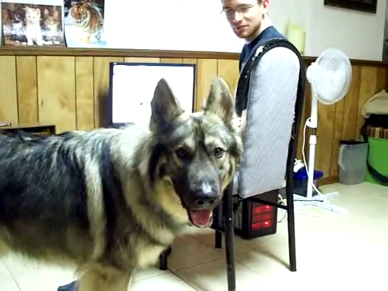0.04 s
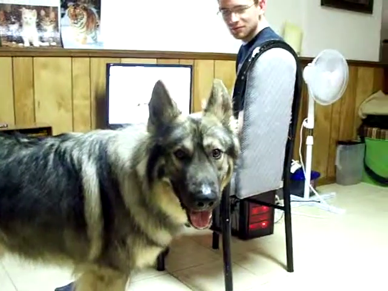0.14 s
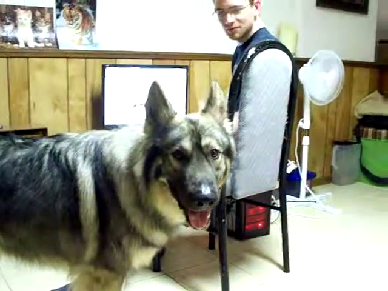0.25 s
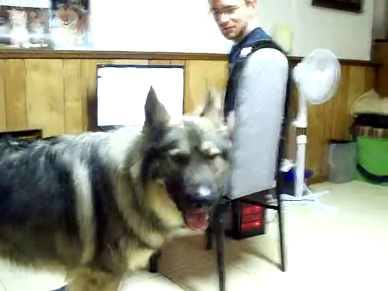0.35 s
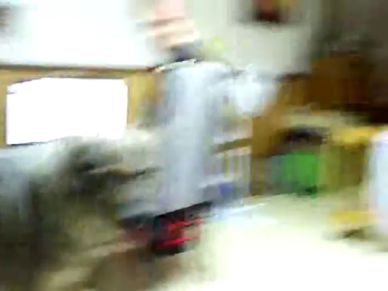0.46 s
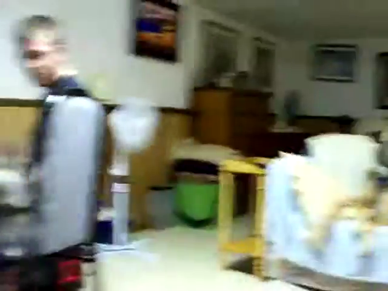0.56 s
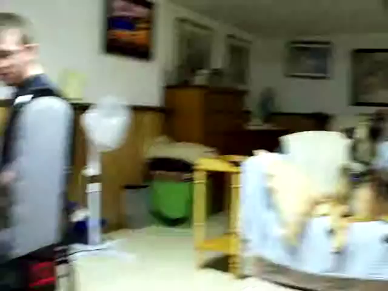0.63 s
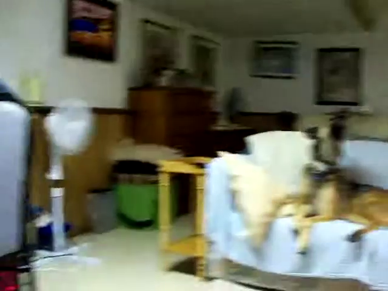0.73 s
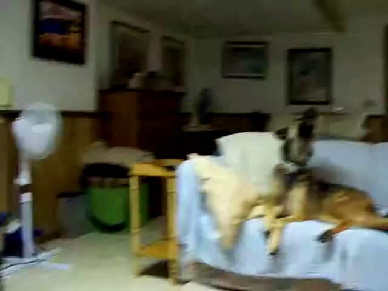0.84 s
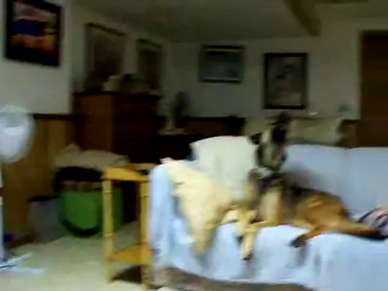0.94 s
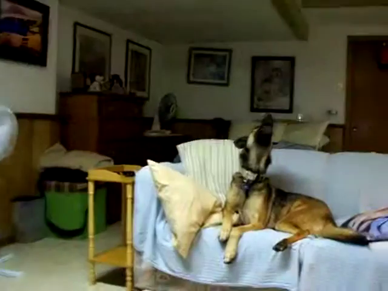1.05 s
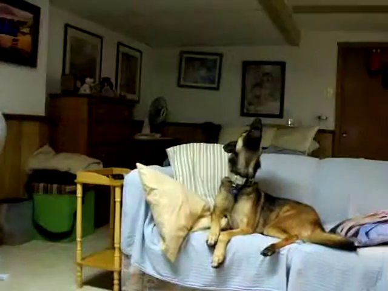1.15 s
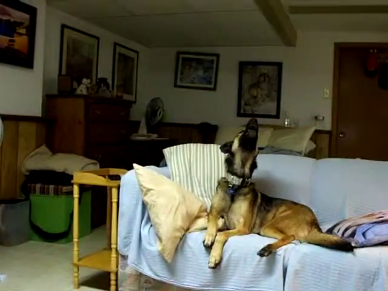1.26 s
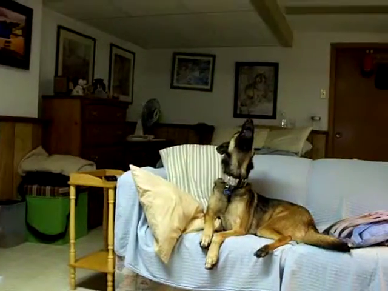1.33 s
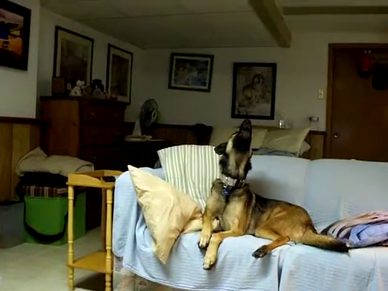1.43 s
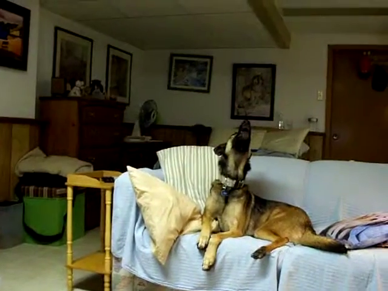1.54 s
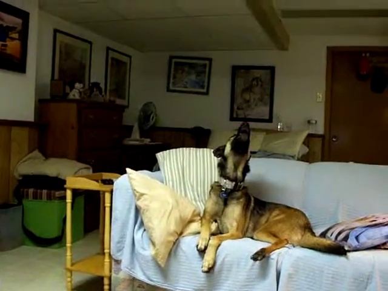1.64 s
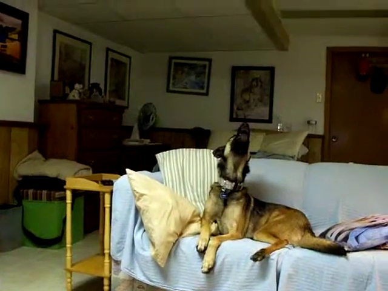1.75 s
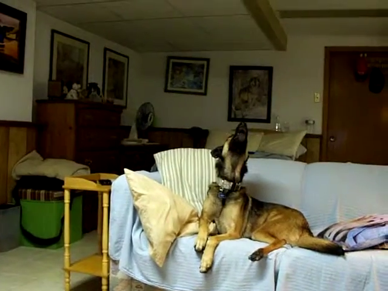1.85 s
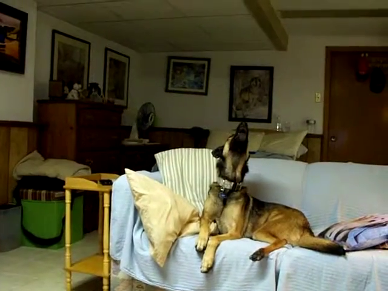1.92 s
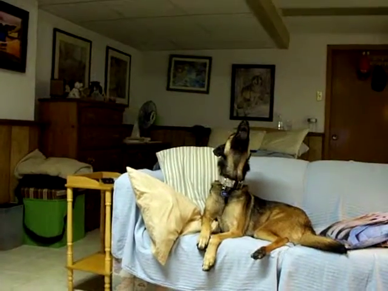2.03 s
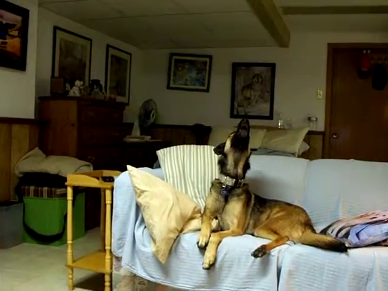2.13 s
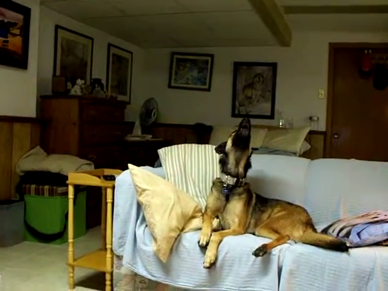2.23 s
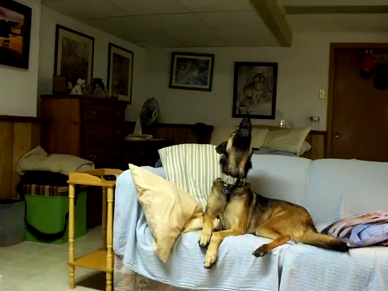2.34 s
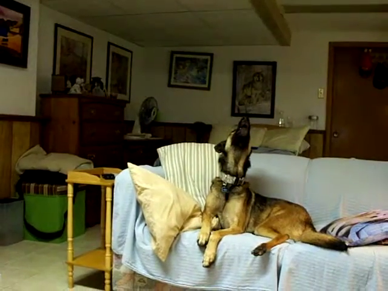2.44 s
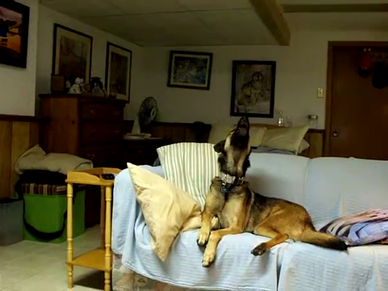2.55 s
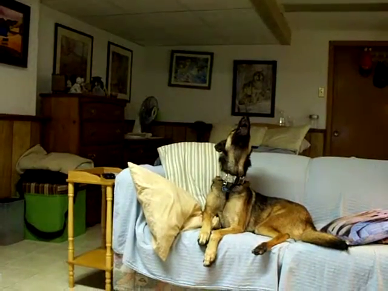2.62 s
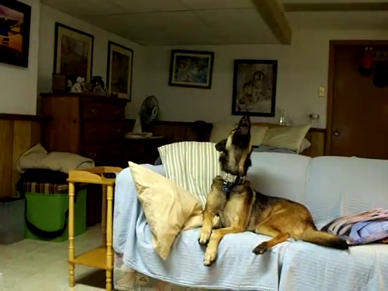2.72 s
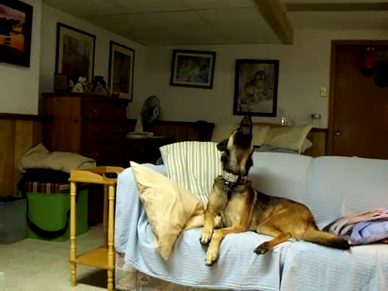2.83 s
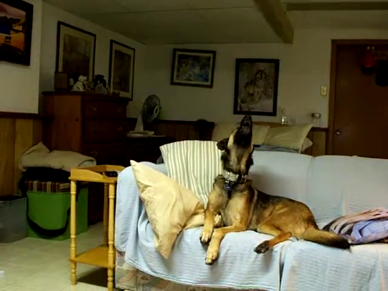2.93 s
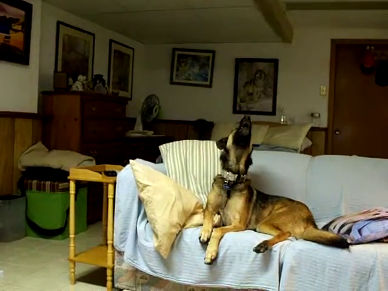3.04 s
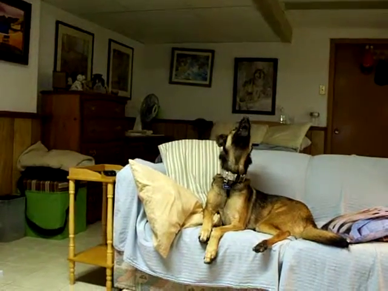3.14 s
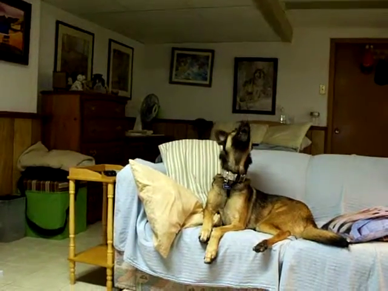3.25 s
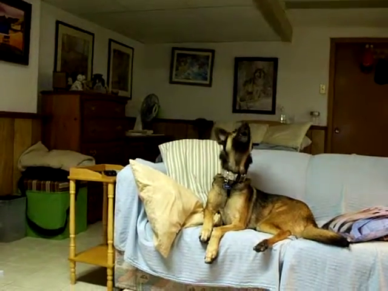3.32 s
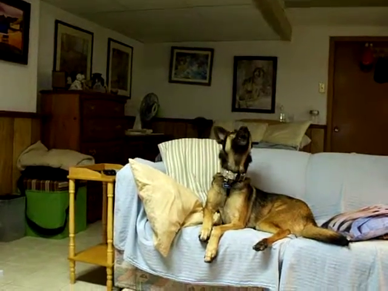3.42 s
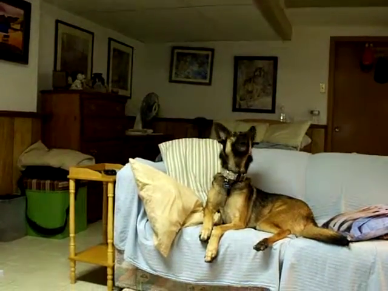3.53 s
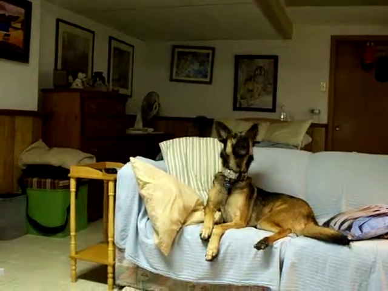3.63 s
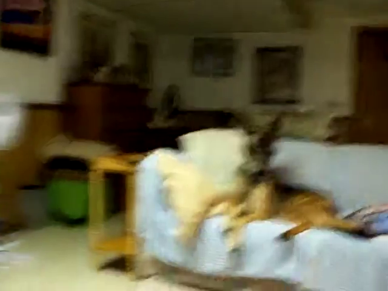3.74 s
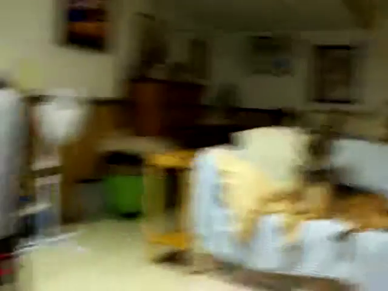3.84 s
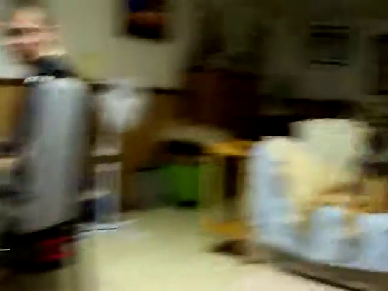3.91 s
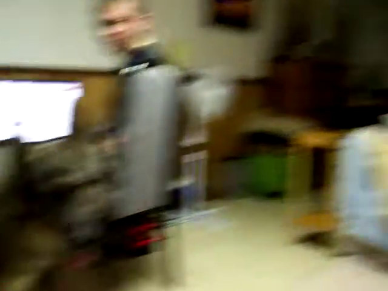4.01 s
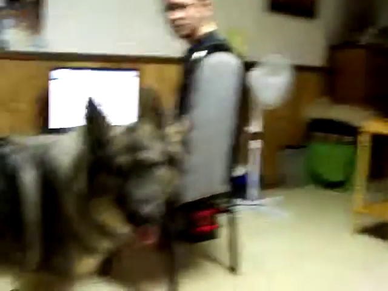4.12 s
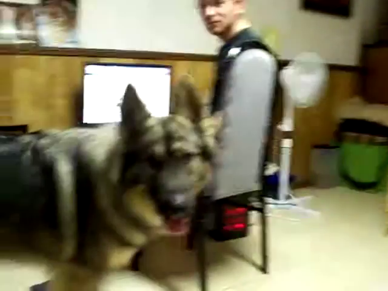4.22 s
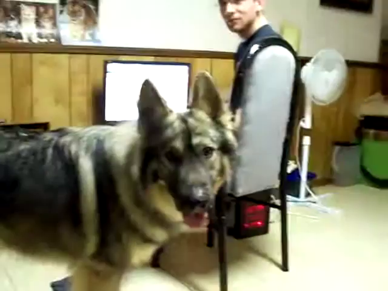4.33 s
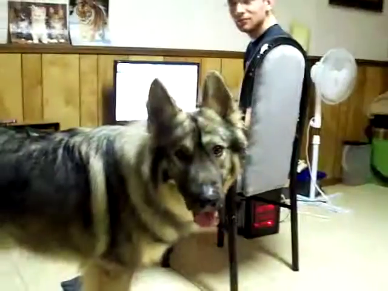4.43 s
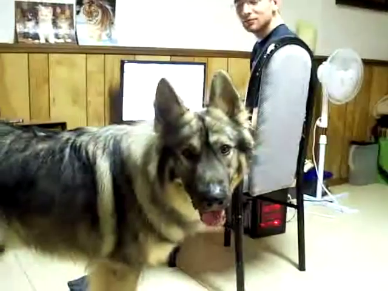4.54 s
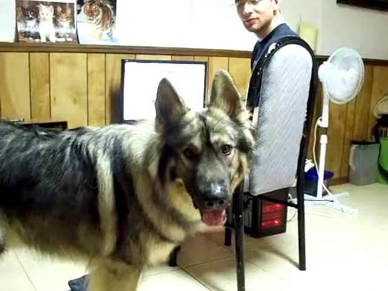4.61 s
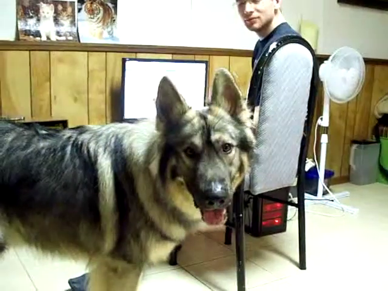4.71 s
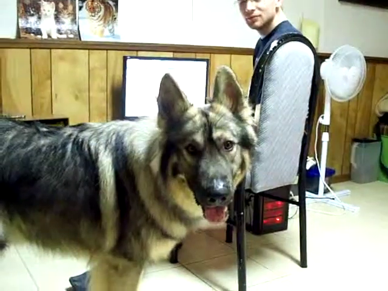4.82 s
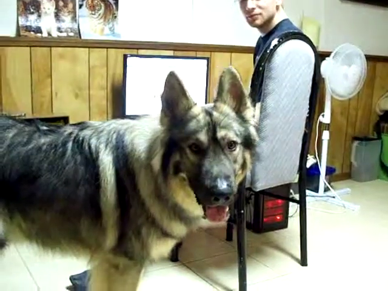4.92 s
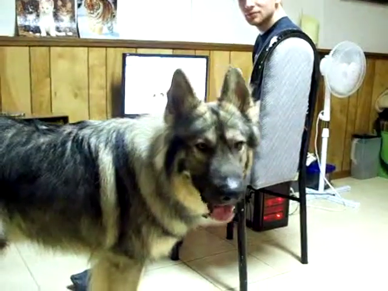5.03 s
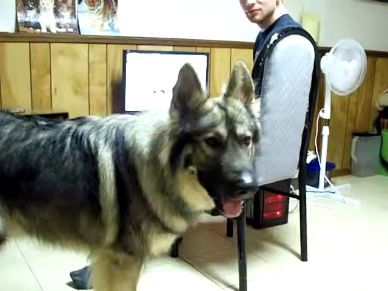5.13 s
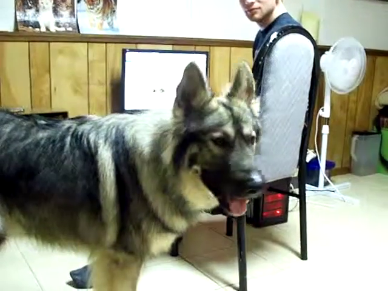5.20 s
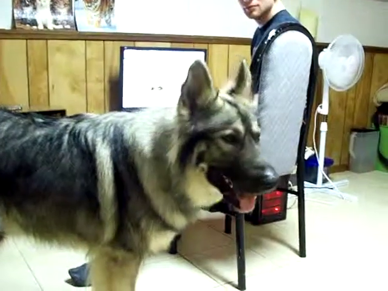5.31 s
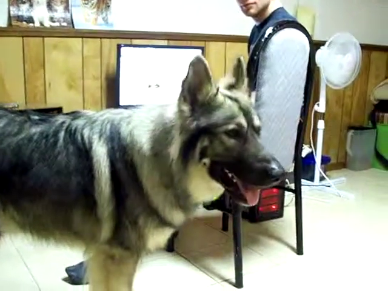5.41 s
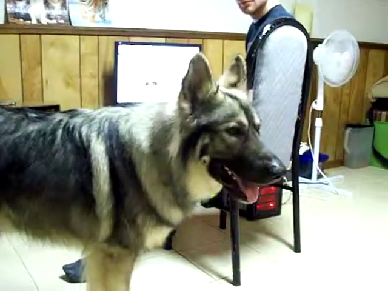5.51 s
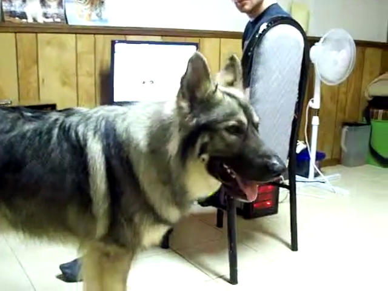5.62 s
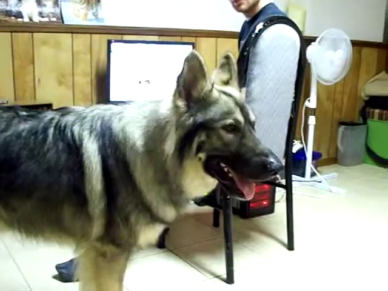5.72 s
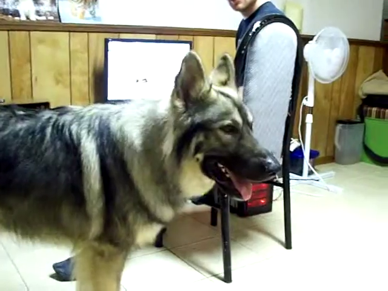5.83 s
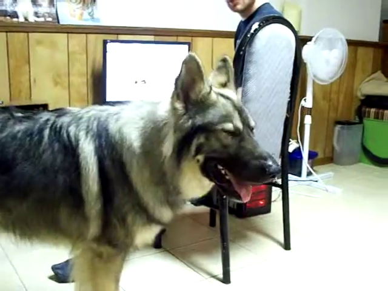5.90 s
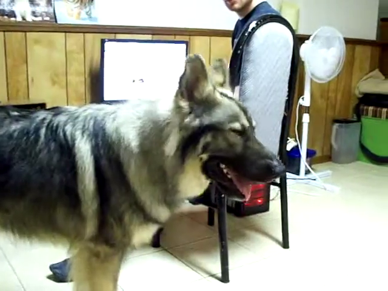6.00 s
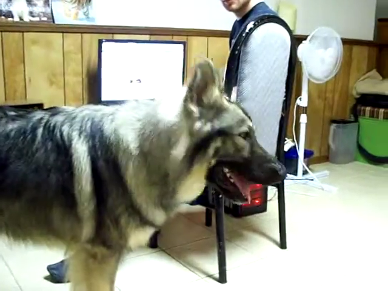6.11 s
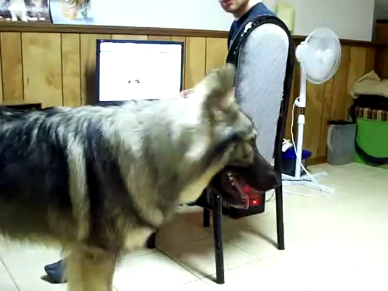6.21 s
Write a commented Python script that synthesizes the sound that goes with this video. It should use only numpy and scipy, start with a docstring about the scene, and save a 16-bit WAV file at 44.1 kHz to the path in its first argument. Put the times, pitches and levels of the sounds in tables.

```python
"""A large dog on a sofa gives a long, two-toned howl, sinks to a moan and then whines thinly; a nearer dog
sings under it at first and later comes in with a loud, pure howl. Dry clicks, a hum and room air lie around them.
Two vocal folds at different rates beat in the sofa howl; sines make the whine and the near howls.
Short decaying rings make the clicks; the loudest peaks are flattened, and a hiss follows the loudness."""
import sys
import numpy as np
from scipy import signal
from scipy.fft import rfft, irfft, next_fast_len
from scipy.io import wavfile
from scipy.ndimage import uniform_filter1d, map_coordinates

SR = 44100
rng = np.random.default_rng(int(sys.argv[2]) if len(sys.argv) > 2 else 0)


def put_to_file(sound):
    """Save the sound as 16-bit audio at rate SR, in the file named by the first command-line argument."""
    columns = np.atleast_2d(sound).T  # one column per channel
    safe = np.clip(columns, -1, 1)
    whole_steps = np.round(safe * 32767)
    wavfile.write(sys.argv[1], SR, whole_steps.astype(np.int16))


N = 276066  # length of the scene [samples]


def amp(db):
    """Turn decibels into a gain."""
    return np.exp(np.asarray(db) * np.log(10) / 20)


def unit(x):
    """Scale a sound to an rms level of 1."""
    return x / np.sqrt(np.mean(x ** 2) + 1e-20)


def along(points, hz):
    """Read a curve of (frequency [Hz], value) points, with frequency on a log axis."""
    f, v = np.transpose(points)
    return np.interp(np.log(hz + 1), np.log(f + 1), v)


def curves(rows):
    """Give one value per sample for each column after the time."""
    s, *cols = np.transpose(rows)
    return [np.interp(np.arange(N) / SR, s, c) for c in cols]


def sounding(rows):
    """Be 1 from the first time in a table to the last, with short soft edges."""
    t = np.arange(N) / SR
    inside = (t >= rows[0][0]) & (t <= rows[-1][0])
    return uniform_filter1d(1. * inside, size=300)


def wobble(rate):
    """Draw a smooth random curve through `rate` random points a second."""
    at = np.arange(0, N + 32, 32)  # work out every 32nd sample, then join them up
    points = rng.standard_normal(int(N * rate / SR) + 4)
    return np.interp(np.arange(N), at, map_coordinates(points, [at * rate / SR]))


def filtered(x, response):
    """Multiply the spectrum of x by a gain that depends on frequency."""
    m = next_fast_len(N + SR // 2)
    return irfft(rfft(x, m) * response(np.fft.rfftfreq(m, 1 / SR)), m)[:N]


def noise(spectrum):
    """Make noise of rms 1, coloured by (frequency [Hz], relative level [dB]) points."""
    return unit(filtered(rng.standard_normal(N), lambda hz: amp(along(spectrum, hz))))


def resonances(modes, f):
    """Add up the gain of peaks, each (centre [Hz], width [Hz], relative level [dB])."""
    return sum(amp(db) / (1 + ((f - c) / (w / 2)) ** 2) for c, w, db in modes)


def swing(pitch, jitter):
    """Give the phase of a vibration whose pitch trembles slightly."""
    return 2 * np.pi * np.cumsum(pitch * (1 + jitter * wobble(160))) / SR


def partials(phases, levels_db, rough):
    """Add sines at the given rms levels; roughness shakes the size of each one."""
    tones = 0
    for phase, db in zip(phases, levels_db):
        tones = tones + amp(db) * (1 + rough * wobble(140)) * np.sin(phase)
    return np.sqrt(2) * tones


def overtones(phase, first, count, slope_db):
    """Add upper harmonics of a fold, changing by slope_db an octave, at rms 1."""
    return unit(sum(amp(slope_db * np.log2(k)) * np.sin(k * phase) for k in range(first, first + count)))


def radiated(x):
    """Remove most of the bass, because a dog's mouth sends out little of it."""
    return filtered(x, lambda hz: 1 - 1 / (1 + (hz / 255) ** 16))


def standing(waves, hz):
    """Give the lift in dB that the room's standing waves add to a tone."""
    grid = np.arange(2000)  # [Hz]
    lift_db = sum(db * np.exp(-((grid - centre) / width) ** 2) for centre, width, db in waves)
    return np.interp(hz, grid, lift_db)


def background():
    """Room air is coloured noise, the fan hums on trembling lines, and an electrical sizzle is narrow noise."""
    # colour of the room air: (frequency [Hz], relative level [dB])
    air_colour = [(15, -29.5), (25, -6), (66, -7), (204, -15.5), (339, -13.5), (2020, -21), (2170, -26),
                  (5310, -31), (6920, -34.5), (8000, -70.5), (10400, -99.5), (17600, -120)]
    # the fan's lines, before the facing gain: (frequency [Hz], level [dB])
    hum_lines = [(161.3, -65), (178, -73)]
    # air and hum change as the microphone turns, more toward the desk: (time [s], gain [dB])
    facing = [(0, 4.5), (.8, 5.5), (3.7, 1.5), (4.15, 7), (6.26, 4.5)]
    air = amp(-58.5) * noise(air_colour)
    hum = np.sqrt(2) * sum(amp(db) * np.sin(swing(hz, jitter=.007)) for hz, db in hum_lines)
    sizzle = unit(filtered(rng.standard_normal(N), lambda hz: resonances([(6920, 370, 0)], hz)))
    return amp(curves(facing)[0]) * (air + hum) + amp(-71.5) * sizzle


def room(x):
    """The furnished room answers with a short noise tail that dies at its own pace in each band."""
    # time to fade by 60 dB: (frequency [Hz], time [s])
    fade_times = [(200, 0.52), (2000, 0.73), (8000, 0.043)]
    hz, t, z = signal.stft(rng.standard_normal(SR // 2), SR, nperseg=256)
    fading = amp(-60 * t / along(fade_times, hz)[:, None])
    tail = signal.istft(z * fading, SR, nperseg=256)[1]
    delayed = np.pad(x, (300, 0))  # [samples]
    return signal.fftconvolve(delayed, tail / np.linalg.norm(tail))[:N]


def knock():
    """Small contacts each ring at one pitch and die away."""
    # a faint tink and a soft bump: (time [s], peak level [dB], pitch [Hz], time to fade by 60 dB [s])
    contacts = [(3.805, -42, 1750, 0.14), (3.928, -40.5, 680, 0.047)]
    out = np.zeros(N)
    for s, db, hz, t60 in contacts:
        t = np.maximum(np.arange(N) / SR - s, 0)
        out += amp(db - 60 * t / t60) * np.sin(2 * np.pi * hz * t)
    return out


def clicks():
    """Each click rings a small hard body and rebounds within two milliseconds."""
    # dry clicks: (time [s], peak level [dB])
    click_times = [(0.1633, -22), (1.074, -19.5), (3.8054, -35.5), (4.0202, -12.5), (4.139, -38),
                   (4.188, -37), (4.5004, -14), (4.6969, -10), (4.7515, -32)]
    # what a click rings with: (frequency [Hz], relative level [dB], time to fade by 60 dB [s])
    body_modes = [(900, -10, 0.036), (1780, -11, 0.034), (1930, -7, .005), (2440, 5, 0.0048),
                  (3110, -11, 0.015), (3670, -6.5, 0.012)]
    out, t = np.zeros(N + SR), np.arange(SR // 10) / SR
    band = signal.butter(3, [1100, 4600], "bandpass", fs=SR, output="sos")
    for s, db in click_times:
        ring = 0
        for hz, level, t60 in body_modes:
            mode_db = level + rng.normal(0, 3.3)  # every click differs a little
            ring = ring + amp(mode_db - 60 * t / t60) * np.sin(2 * np.pi * hz * t)
        grit = amp(-31 - 60 * t / .05) * rng.standard_normal(len(t))
        ring = signal.sosfilt(band, ring + grit)
        ring = amp(db) * ring / np.abs(ring).max()
        for delay, size in [(.0005, 1), (.0019, -0.2)]:  # the hit, then its rebound
            out[round((s + delay) * SR):][:len(t)] += size * ring
    return out[:N]


def whistle():
    """A faint, pure nasal tone slides down on a pitch of its own above the howl."""
    # (time [s], pitch [Hz], level [dB])
    glide = [(1.57, 1582, -53.5), (1.63, 1550, -46), (1.8, 1522, -44), (1.95, 1495, -46),
             (2.1, 1430, -57.5), (2.25, 1419, -62)]
    pitch, db = curves(glide)
    return partials([swing(pitch, jitter=0.0022)], [db], rough=0.37) * sounding(glide)


def sofa_whine():
    """A croaky start clears into a thin tone that scoops up, then sinks toward a resting pitch."""
    # standing waves once the microphone faces the desk: (centre [Hz], half width [Hz], lift [dB])
    desk_waves = [(960, 22, 2), (925.6, 7.4, -9.5), (899, 10, -4.5), (878, 9, -5), (1419, 20, -10),
                  (1401, 26, 6), (1330, 22, -5.5)]
    # harmonics 1-4: (level [dB], extra while the mouth is open [dB], change [dB per s])
    whine_tones = [(-45, -11, -8), (-40, -2.5, -2), (-46, 7.5, -8.5), (-57, 12, 4)]
    start_s, scoop_s, sink_s, open_s = 4.117, .05, 1.8, 0.12
    rest_hz, lift_hz, scoop_hz = 326.8, 177.2, 121.95
    age = np.maximum(np.arange(N) / SR - start_s, 0)
    pitch = rest_hz + lift_hz * np.exp(-age / sink_s) - scoop_hz * np.exp(-(age / scoop_s) ** 2)
    mouth = np.exp(-(age / open_s) ** 4)
    croak = 0.57 * np.exp(-age / 0.082)
    rough = 0.068 + croak
    f = swing(pitch, 0.00033 + 0.0498 * rough)
    levels_db = [db + open_db * mouth + fade * age + standing(desk_waves, k * pitch)
                 for k, (db, open_db, fade) in enumerate(whine_tones, 1)]
    tones = partials([f, 2 * f, 3 * f, 4 * f], levels_db, rough)
    breath = noise([(400, -19), (800, 0.5), (1100, -14), (1600, 5), (2600, -13), (4500, -32)])
    rasp = amp(-36.5) * croak * breath
    return (tones + rasp) * (1 - np.exp(-age / 0.0064))


def near_howl(start, end, hz, sag, db, yelp_end, yelp_hz, yelp_db, fade_db):
    """An open-mouthed yelp scoops up, closes into an almost pure tone and at last drops away."""
    # harmonics 1-3: (relative level [dB], extra while the mouth gapes [dB], share of the fade)
    near_tones = [(0, -14, 1), (-18, 10.5, 0.41), (-35.5, 16, -0.22)]
    scoop_hz, scoop_s, gape_s = 115, .035, 0.061  # the pitch scoops up while the gaping mouth closes
    slide_hz_per_s, release_s = 330, .006  # the yelp's downward slide and its letting go
    drop_hz, drop_db, drop_s = 84.5, -39.5, .07  # the howl ends by falling away
    edge_db, yelp_edge_db = -47.5, 16.5  # upper overtones over the level, and their rise in a yelp
    yelp_rasp_db, yelp_shake_db = -37, 1.64  # a yelp is hoarse and unsteady
    t = np.clip(np.arange(N) / SR, start, end)
    age = t - start
    yelp = (1 - np.tanh((t - yelp_end) / (2 * release_s))) / 2
    gape = np.exp(-(age / gape_s) ** 2)
    drop = np.exp((t - end) / drop_s)
    held_hz = hz - sag * age - scoop_hz * np.exp(-(age / scoop_s) ** 1.3)
    pitch = held_hz - drop_hz * drop + yelp * (yelp_hz + slide_hz_per_s * (yelp_end - t))
    level_db = db + yelp * (yelp_db + yelp_shake_db * wobble(60)) + drop_db * drop ** 2 + 0.19 * wobble(13)
    f = swing(pitch * (1 + .002 * wobble(8)), jitter=0.002 + .006 * yelp)
    levels_db = [level_db + tone_db + gape_db * gape + share * fade_db * age ** 2
                 for tone_db, gape_db, share in near_tones]
    tones = partials([f, 2 * f, 3 * f], levels_db, rough=0.0042)
    # muzzle resonances: (centre [Hz], width [Hz], relative level [dB])
    muzzle = [(1490, 360, -11.5), (1786, 87, -9), (2067, 100, -7), (2250, 150, -15.5),
              (2700, 280, -17.5), (3130, 360, -24.5)]
    upper = filtered(overtones(f, 4, count=6, slope_db=1.0), lambda hz: resonances(muzzle, hz))
    edge = amp(level_db + edge_db + yelp_edge_db * yelp) * unit(upper)
    edge = edge * amp(2.5 * yelp * wobble(90))
    breath = noise([(300, -34), (700, 0.5), (1400, 2), (2500, -10), (3200, -16), (6000, -25)])
    puffs = (1 + np.cos(f)) * breath  # one puff in every cycle
    rasp = amp(level_db + yelp_rasp_db) * yelp * puffs
    return (tones + edge + rasp) * sounding([(start,), (end,)])


def sofa_howl():
    """Two folds swing at different rates; their collisions make sum and difference tones."""
    # pitch of the fast fold: (time [s], pitch [Hz])
    howl_pitch = [(.1, 432), (.2, 487.3), (.3, 468.4), (.6, 465.9), (.8, 475.2), (.9, 489.6), (1.15, 489.6),
                  (1.42, 482.1), (2.12, 465.7), (2.27, 444.1), (2.4, 444.7), (2.44, 425.6), (2.72, 402.9),
                  (3.05, 396.4), (3.23, 369.3), (3.4, 333), (3.48, 294.5), (3.63, 271.8)]
    # pitch of the slower fold: (time [s], pitch [Hz])
    slow_fold_pitch = [(.1, 361.1), (.7, 359), (1.0, 372.6), (1.5, 368.3), (2.13, 360.2), (2.7, 323.6),
                       (3.24, 306)]
    # how hard the dog pushes: (time [s], level [dB])
    howl_effort = [(0.1, -24), (0.25, -23), (0.9, -24), (1.5, -25), (2.05, -21), (2.3, -27.56),
                   (2.45, -26.5), (3.05, -35.5), (3.25, -31), (3.5, -37.5), (3.65, -38.5), (3.8, -69.5)]
    # how widely the slower fold swings: (time [s], level [dB])
    slow_swing = [(0.1, -0.6), (0.3, 1.5), (0.7, -1.6), (1.1, -2.5), (1.5, -5.5), (2.0, -14), (2.2, -29),
                  (2.7, -15), (2.93, -1.5), (3.1, -4), (3.24, -36)]
    # the overtones: (time [s], level [dB], shrill treble above that [dB])
    edge_levels = [(0, -28, -17.5), (.11, -34.5, -15.5), (.17, -37, -9.5), (.27, -42, -3.5), (.8, -35, -11),
                   (1.3, -40.5, -10.5), (1.85, -38, -13), (2.2, -49, -9), (2.3, -44.5, -17),
                   (2.55, -41.5, -17), (3.1, -41.5, -29), (3.45, -54.5, -27.5), (3.8, -77.5, -12)]
    # tones of the two folds: (multiple of the fast pitch, multiple of the slow pitch)
    fold_mixes = [(1, 0), (2, 0), (3, 0), (0, 1), (0, 2), (2, -1), (3, -2), (1, 1), (3, -1)]
    # their strengths, in that order: (level over the effort [dB], change per dB of slow swing [dB],
    # extra in the attack [dB])
    fold_tones = [(.5, 0, 4.5), (-4.5, 0, -2.5), (-20.5, 0, 4), (-8.5, 1.1, 1), (-13, 0.64, 23.5),
                  (-5, 0.85, -18.5), (-14.5, 1.5, 8), (1, 1.75, -1), (-15, 0.75, 1)]
    # standing waves from sofa to microphone; gliding tones swell and dip:
    # (centre [Hz], half width [Hz], lift [dB])
    sofa_waves = [(382.8, 23.9, 17.5), (382.3, 7.4, -10), (427.4, 17.9, 13), (450, 1.8, -23),
                  (466.7, 7.0, 6), (489.4, 1.6, -13.5), (575.5, 4, -5.5), (602.8, 25.3, 15), (683, 7.3, 13),
                  (732.9, 6.6, -12), (839, 32, -9.5), (976, 4.6, 8), (1056.6, 20.1, 11.5),
                  (1440, 63.1, -22)]
    # throat resonances: (centre [Hz], width [Hz], relative level [dB])
    throat = [(1070, 170, 7), (1296, 430, -13.5), (1604, 160, -3), (1787, 66, 3), (1875, 110, -2.5),
              (2290, 67, -4.5)]
    # narrow shrill bands above the howl: (centre [Hz], width [Hz], relative level [dB])
    shrill_bands = [(4020, 170, -16), (4710, 180, -2), (5340, 110, -11.5), (6687, 240, -3)]
    # the mouth's one ring: (centre [Hz], width [Hz], relative level [dB])
    mouth = [(2632, 96, 0)]
    mouth_db, mouth_follow = -7, 0.33  # its level over the edge, and how far it follows the shrillness
    break_s, attack_s, tail_s = .16, .13, .25  # harshest as the voice breaks in, then clear, frayed at the end
    flutter_db, flutter_per_s = 6.5, 20  # the fading voice falters
    t = np.arange(N) / SR
    (pitch,), (slow_pitch,) = curves(howl_pitch), curves(slow_fold_pitch)
    (effort_db,), (swing_db,) = curves(howl_effort), curves(slow_swing)
    edge_db, shrill_db = curves(edge_levels)
    attack = np.exp(-np.abs(t - break_s) / attack_s)
    tail = np.exp(-np.abs(t - howl_effort[-1][0]) / tail_s)
    rough = 0.031 + .27 * attack + 0.32 * tail
    effort_db = effort_db + flutter_db * tail * wobble(flutter_per_s)
    f = swing(pitch, 0.0011 + 0.0402 * rough)
    g = swing(slow_pitch, 0.0012 + 0.049 * rough)
    tones = 0
    for (m, n), (db, follow, attack_db) in zip(fold_mixes, fold_tones):
        level_db = effort_db + db + follow * swing_db + attack_db * attack
        level_db = level_db + standing(sofa_waves, m * pitch + n * slow_pitch)
        tones = tones + partials([m * f + n * g], [level_db], 0.41 * rough)
    # the mouth radiates little below the folds' own pitch, so their beat is only a faint throb
    throb = amp(effort_db + np.minimum(swing_db, -4) - 26) * np.sin(f - g)
    # the slower fold rocks the moment of closure, which splits every overtone into a comb
    coupling = np.minimum(amp(0.65 * swing_db + 5.0), 1)
    closure = f + .3 * coupling * np.sin(f - g)
    slap = overtones(closure, 3, count=17, slope_db=5.5) * (1 + 0.38 * coupling * np.cos(f - g))
    slap = slap + (.08 + 2 * rough) * rng.standard_normal(N)

    def below_treble(modes):
        """Ring the slap in resonances, cut off steeply above 2850 Hz."""
        return unit(filtered(slap, lambda hz: resonances(modes, hz) / (1 + (hz / 2850) ** 24)))

    edge = amp(edge_db) * below_treble(throat)
    ring_db = edge_db + mouth_db + mouth_follow * (shrill_db - shrill_db.mean())
    edge = edge + amp(ring_db) * below_treble(mouth)
    shrill = amp(edge_db + shrill_db) * unit(filtered(slap, lambda hz: resonances(shrill_bands, hz)))
    # a hoarse voice lets a puff of noise through in every cycle
    breath = noise([(400, -38.5), (600, -2.0), (800, -3.5), (1400, 1), (2200, -13), (4000, -38.5)])
    rasp = amp(edge_db + 14) * rough * (1 + np.cos(f)) * breath
    # a harsh rattle comes first; the full tones break in after it
    voiced = sounding(howl_effort)
    harsh = (edge + shrill + rasp) * sounding(edge_levels)
    return radiated(tones * voiced + harsh) + throb * voiced


def scene():
    """The sofa dog is farther off and so has more room in its voice."""
    # each near howl opens with a yelp and settles on a held note; the first is already under way:
    # (start [s], end [s], pitch [Hz], sag [Hz per s], level [dB], end of yelp [s],
    # yelp lift [Hz], yelp lift [dB], fade [dB per s squared])
    near_howls = [(-.2, 1.16, 400.6, 3.96, -17, .107, 28, 11, -0.84),
                  (4.966, 7.0, 426, 15.5, -10, 5.072, 13, 5, -3.5)]
    air = background()
    far = knock() + whistle() + sofa_whine() + sofa_howl()
    near = clicks() + radiated(sum(near_howl(*row) for row in near_howls))
    echo = room(amp(-16) * far + amp(-28) * near)
    return (far + near + echo + air)[None]


def record(dry):
    """The loudest peaks are flattened, a hiss rises and falls with the loudness, and the top treble is cut."""
    # colour of the hiss: (frequency [Hz], relative level [dB])
    hiss_colour = [(100, -10), (400, 7), (1500, -4), (3000, -6.5), (7000, -5.5), (8000, -11), (8700, -20.5)]
    ceiling, cutoff_hz = .71, 8300
    x = dry[0] / (1 + np.abs(dry[0] / ceiling) ** 16) ** (1 / 16)
    level = np.sqrt(np.abs(uniform_filter1d(x ** 2, size=400)))
    x = x + amp(-34) * level * noise(hiss_colour)
    return filtered(x, lambda hz: 1 / np.sqrt(1 + (hz / cutoff_hz) ** 60))[None]


dry = scene()
out = record(dry)
put_to_file(out)
```